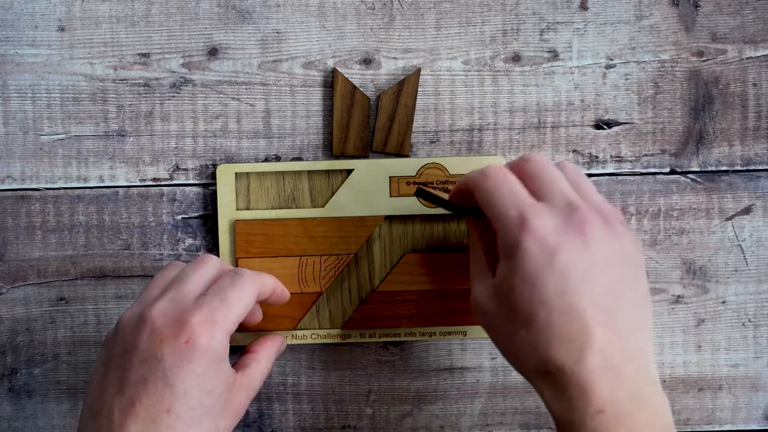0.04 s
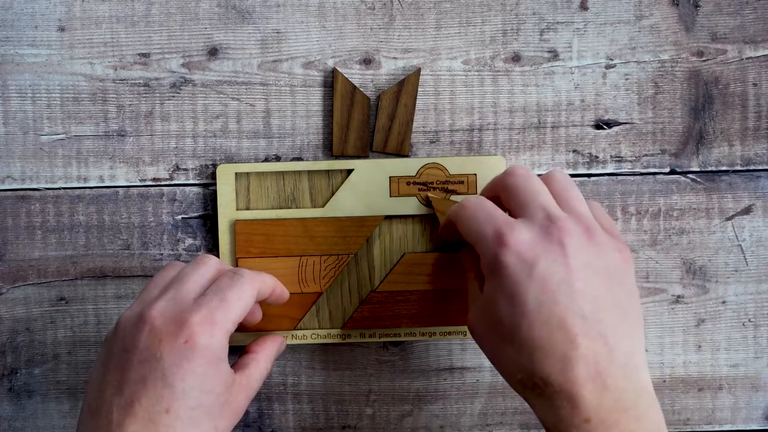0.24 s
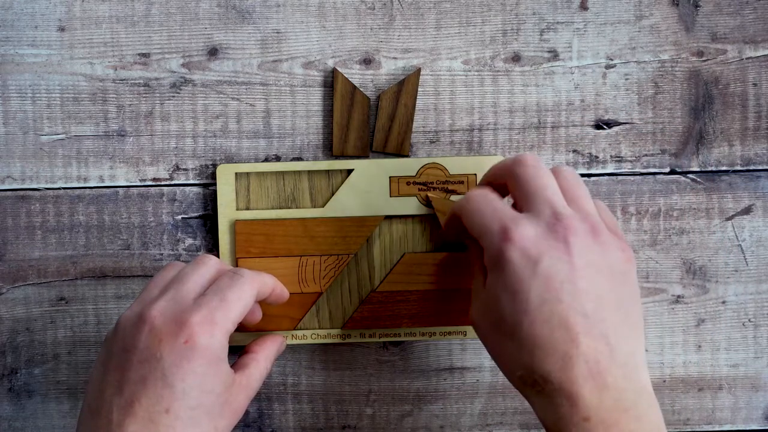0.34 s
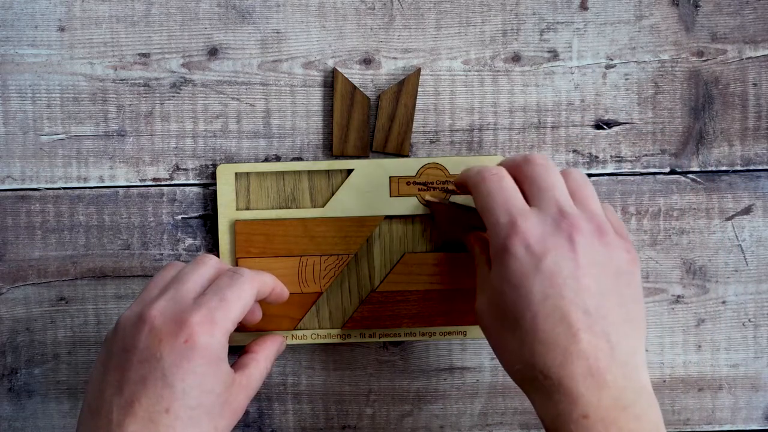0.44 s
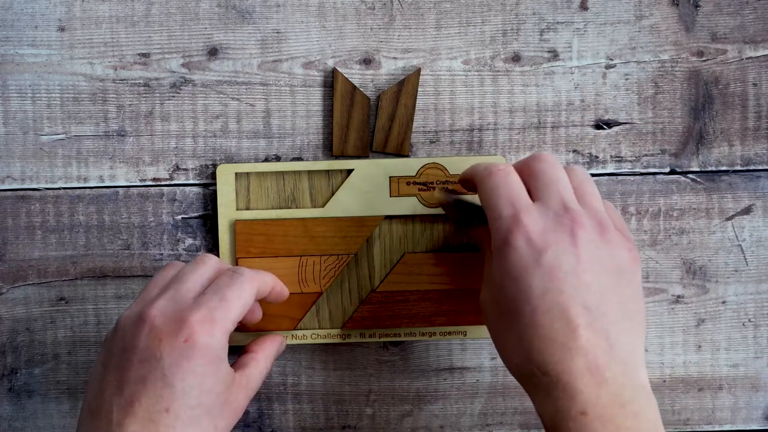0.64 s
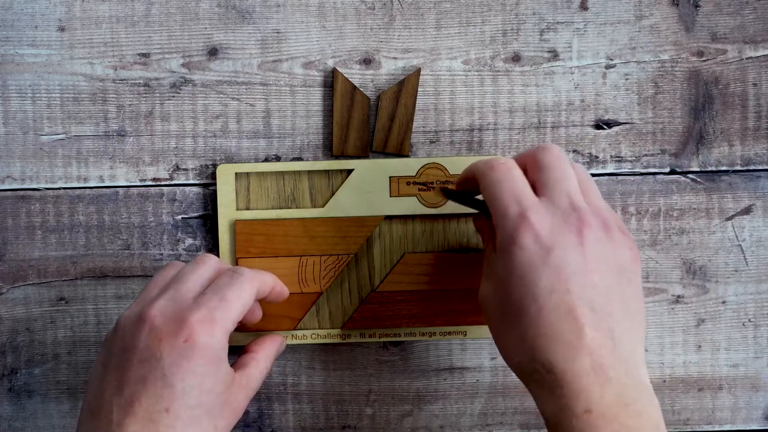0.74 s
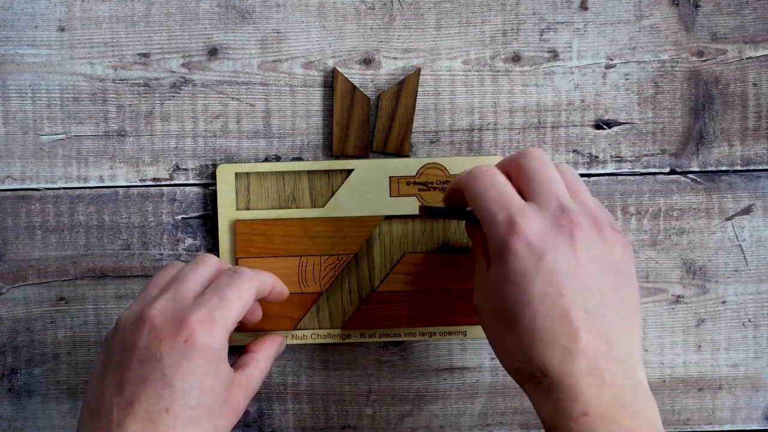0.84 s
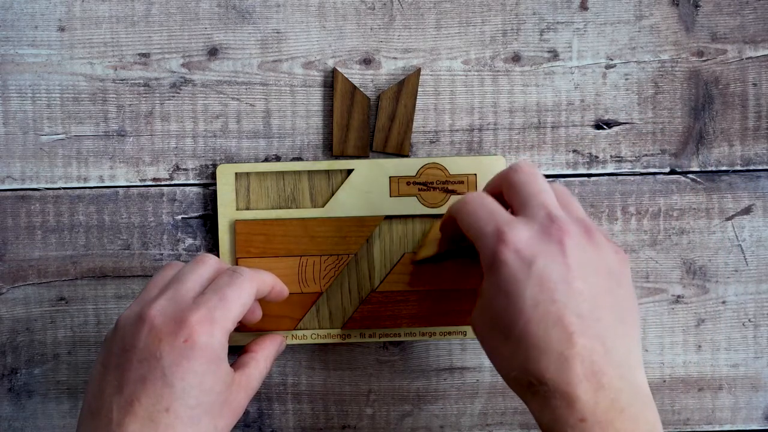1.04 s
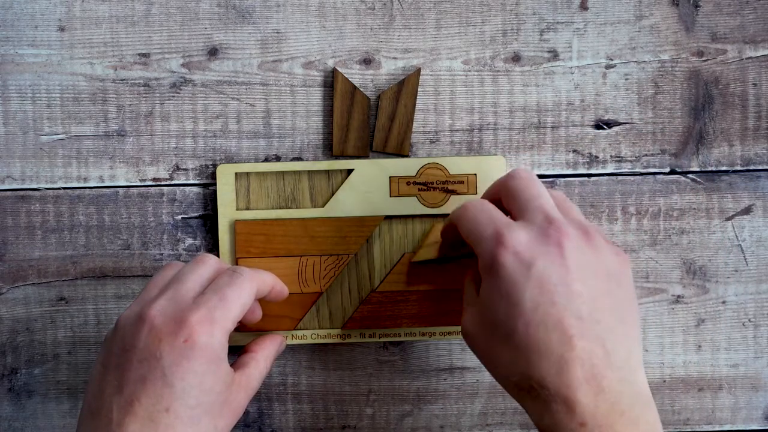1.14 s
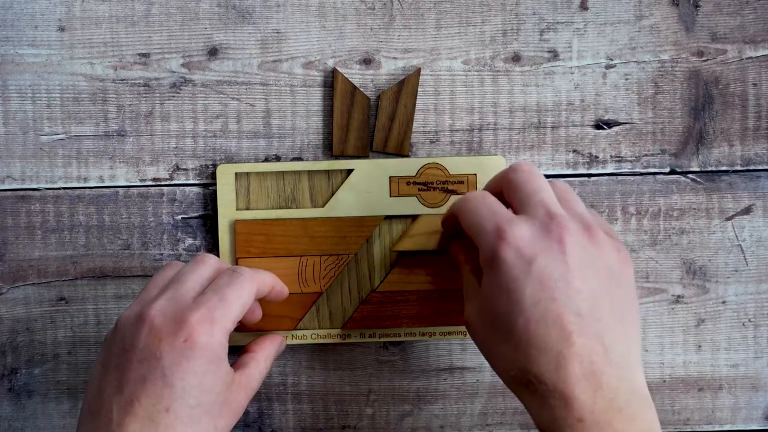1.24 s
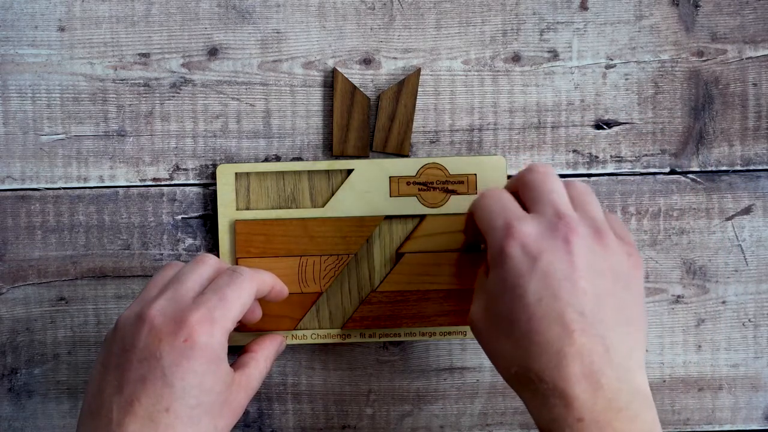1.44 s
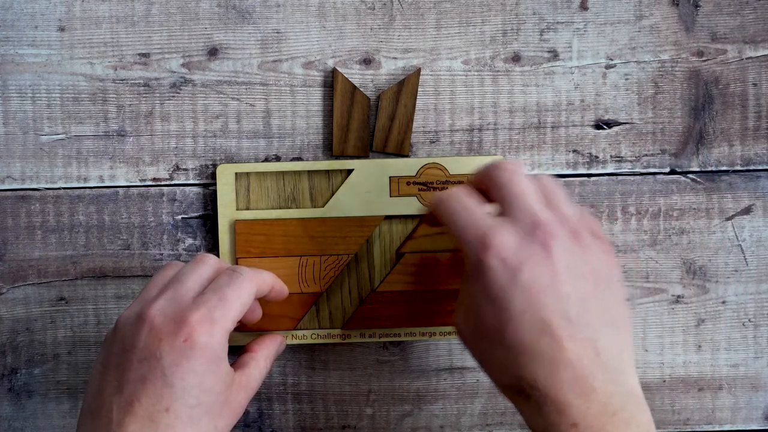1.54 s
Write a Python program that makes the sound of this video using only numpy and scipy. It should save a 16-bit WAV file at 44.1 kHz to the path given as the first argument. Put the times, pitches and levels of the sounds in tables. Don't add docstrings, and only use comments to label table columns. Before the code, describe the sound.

Thin wooden puzzle piece clicking on a plywood frame, close and dry in a small room with faint hiss. Light ticks at 0.04 and 0.16 s, a bright hard rattle with finger brushing at 0.23-0.32, small ticks near 0.5, a soft rub at 0.69, clacks at 1.11, a short scraping drag at 1.23, crisp seating clicks at 1.32, then faint touches until about 1.6.

```python
import sys
import numpy as np
from scipy import signal
from scipy.fft import rfft, irfft, next_fast_len
from scipy.io import wavfile

SR = 44100
rng = np.random.default_rng(int(sys.argv[2]) if len(sys.argv) > 2 else 0)


def gain_from_db(level_db):
    decades = np.asarray(level_db, float) / 20
    return 10 ** decades


def put_to_file(sound):
    columns = np.atleast_2d(sound).T
    safe = np.clip(columns, -1, 1)
    whole_steps = np.round(safe * 32767)
    wavfile.write(sys.argv[1], SR, whole_steps.astype(np.int16))


N = 70560

# pitch_hz, density_db (per Hz)
HUSH = [(18, -67), (30, -40), (233, -8.5), (295, -8), (355, -10.5), (760, -17.5), (2010, -14.5),
        (2170, -19.5), (16000, -36)]
# pitch_hz, likeness (0-1)
HUSH_ALIKE = [(60, 0.073), (300, 0.55), (1400, 0.39), (7000, 0.59), (15000, 1)]
# pitch_hz, t60_s
ROOM_DECAY = [(300, 0.61), (1000, 0.38), (3000, 0.27), (6000, 0.23), (14000, 0.27)]
# pitch_hz, left_minus_right_db
PAN = [(300, .3), (1500, -1.4), (3000, -.2), (6000, -.4), (12000, 1)]

# pitch_hz, level_db, t60_s
TABLE = [(246, -27, 0.014), (323, 20.5, 0.045), (418, 21, 0.012), (910, 22, 0.0098), (1360, -14, .008)]
FRAME = [(880, -3, .011), (1050, -4, .014), (1350, -4, .011), (1620, -2, .012), (2100, -4, .008),
         (2420, -6, .008)]
EDGE = [(7300, -10, 0.0051), (7580, 5.5, 0.0085), (8160, -2.5, 0.0052), (8630, -11, 0.0029),
        (10200, -14, 0.0041), (11200, -6, 0.0034), (14100, 3.5, 0.0059)]
# pitch_hz, level_db, t60_s
SINGING = [(7270, 0, .05), (7410, -2, .035), (14100, -9, .035)]
# pitch_hz, level_db, t60_s
TUMBLING = [(2600, -5.5, 0.0068), (3044, -0.5, 0.0059), (3750, -6.5, 0.0074), (4090, 3.5, 0.0086),
            (4200, 1, 0.0092), (4580, -10, 0.0046), (5130, 0, 0.0096), (5330, -28, 0.002),
            (6560, -11, .005)]
# pitch_hz, level_db, t60_s
LIFTED = [(1467, -7.5, 0.02), (1870, -13, 0.008), (2550, -3.5, 0.0084), (3225, -5.5, 0.009),
          (3760, -2.5, 0.0046), (4040, 1.5, 0.0091), (4345, 4, 0.0094), (4990, -2.5, 0.016),
          (6300, -6, 0.0042)]
# pitch_hz, level_db, t60_s
SEATED = [(1520, -13, .006), (2630, -23, 0.0079), (3300, -16.5, 0.0054), (4150, -5.5, 0.0063),
          (4640, 4, 0.0049), (5230, 5.5, 0.0072), (5750, 9, 0.0037), (6240, 3.5, 0.0079)]
# pitch_hz, level_db, t60_s
HELD = [(2050, 0.5, 0.014), (3180, -1, 0.005), (3830, 6.5, 0.0039), (5180, 6, 0.0052), (6200, -17, 0.0044)]
# pitch_hz, level_db, t60_s
WEDGED = [(2310, 1, 0.0068), (2900, -2, 0.0046), (3500, 2, .005), (4200, -8, .004)]
# pitch_hz, level_db, t60_s
SKIN = [(2580, -6.5, 0.0055), (3710, 5.5, 0.0031), (4650, 7.5, 0.0022), (5630, -3.5, 0.0036),
        (6750, -13, 0.0038)]
# pitch_hz, level_db, t60_s
RUBBED = [(1090, -3.5, 0.013), (1550, -2, 0.012), (2370, -0.5, 0.007), (3500, -6, 0.0035),
          (5300, -3, 0.0052), (7240, -1, 0.0058), (7600, -1, 0.0028), (9100, -9, 0.0028),
          (11800, -4, 0.0018)]
# pitch_hz, level_db, t60_s
SLOT = [(1710, -14, 0.0078), (2260, -2.5, 0.0034), (2960, 3.5, 0.0016), (3240, 2, 0.0027),
        (3800, -16, 0.0055), (7530, -5.5, 0.0053)]

# peak_s, rise_s, fall_s, level_db
BRUSHES = [
    (.28, 0.033, 0.018, -31),
    (.33, 0.037, 0.013, -37.5),
    (1.6, 0.1, 0.039, -44),
]
# peak_s, rise_s, fall_s, level_db
SLIDES = [(.180, 0.006, 0.058, -53), (.205, 0.015, 0.052, -53), (.512, 0.09, 0.026, -56),
          (.585, 0.035, 0.044, -55.5), (1.035, 0.021, 0.051, -55), (1.065, 0.034, 0.16, -55),
          (1.21, 0.012, 0.04, -59)]
# peak_s, rise_s, fall_s, level_db
RUBS = [
    (.66, 0.068, 0.01, -50),
    (.688, 0.034, 0.018, -40),
]
# peak_s, rise_s, fall_s, level_db
DRAGS = [
    (1.226, 0.018, 0.0077, -40),
    (1.238, .012, 0.016, -39.5),
    (1.268, 0.16, 0.077, -48.5),
]
# start_s, level_db
THUDS = [(0.2362, -36), (0.266, -58), (.304, -37), (.9930, -38), (1.043, -42.5), (1.088, -38), (1.109, -34),
         (1.121, -50), (1.32, -83)]
# start_s, level_db, frame_db, edge_db, contact_ms
TOUCHES = [(0.0389, -47.5, -18, 0.5, 0.085), (0.0412, -53.5, -15, 6, 0.06),
           (0.1272, -55.5, 13.5, -29, 0.44), (0.1615, -25.5, -14, -21, 0.17), (0.1623, -35, 5, -28, 0.053),
           (0.428, -40, -17, -22, 0.2), (0.459, -47, 2, -8, 0.14), (0.4955, -28, -17, -9, 0.026),
           (0.502, -56.5, 3.5, -18, 0.047), (0.5054, -54, 17, -35, 0.18), (1.0384, -51, -15, 8, 0.055),
           (1.0439, -38, 7.5, -9, 0.31), (1.0494, -41, 10, 5.5, 0.15), (1.057, -59, 2, -8, .4),
           (1.0900, -45, 11.5, 4.5, 0.25), (1.0957, -44, -4, 4, 0.19), (1.207, -48, -15, -1, 0.46),
           (1.2222, -25.5, -20, -12, 0.27), (1.2325, -34, -28, -18, 0.3), (1.2358, -30, -14, -14, 0.27),
           (1.238, -30, -7.5, -18, 0.5), (1.454, -40, -7, -14, 0.16), (1.5192, -41.5, -6, -7, .12),
           (1.3082, -32, -27, -26, 0.16), (.9925, -62.5, 10.5, -7, 0.2)]
# start_s, level_db
CLICKS = [(.2350, -9), (.2363, -15), (.2491, -25), (.2664, -10), (.2682, -10), (.2688, -14), (.2715, -9),
          (.2758, -24), (.2822, -25), (.3031, -10), (.3056, -11), (.3190, -24), (.3201, -18), (1.1087, -9),
          (1.1152, -11), (1.1214, -14), (1.1261, -23), (1.1352, -26), (1.3178, -7), (1.3184, -15),
          (1.3214, -6), (1.3228, -16), (1.3265, -20), (1.3352, -26), (1.3445, -29)]
# frame_db, edge_db, contact_ms
CLICK_COLOURS = [(-15, -9, .07), (-20, 0, .1), (-14, -6, .1), (-24, -16, .16), (-22, -8, .12),
                 (-24, -10, .12), (-24, -9, .16), (-18, -12, .2), (-16, -6, .15), (-22, -14, .17),
                 (-20, -8, .14), (-24, -16, .2), (-22, -12, .2), (-22, -3, .11), (-18, 2, .08),
                 (-16, -16, .18), (-16, -10, .18), (-16, -5, .15), (-32, -5, .1), (-32, 0, .09),
                 (-34, -1, .06), (-28, -8, .11), (-24, -10, .14), (-22, 2, .1), (-22, -2, .1)]

FRAME_LOW_HZ, PIECE_LOW_HZ = 465, 1296
RING_S = np.arange(SR // 16) / SR


def unit(x):
    return x / np.sqrt(np.mean(x ** 2) + 1e-20)


def along(points, hz):
    point_hz, value = np.transpose(points)
    return np.interp(np.log(hz + 1), np.log(point_hz + 1), value)


def filtered(x, response):
    m = next_fast_len(N + 8192)
    return irfft(rfft(x, m) * response(np.fft.rfftfreq(m, 1 / SR)), m)[..., :N]


def above(x, low_hz):
    return filtered(x, lambda hz: (-hz * hz / (low_hz ** 2 - hz * hz + 1.3j * hz * low_hz)) ** 2)


def soften(x, contact_ms):
    u = np.arange(.5, 40) / SR / (max(contact_ms, .04) / 1000)
    push = np.sin(np.pi * np.minimum(u, 1)) ** 2 + 1e-9
    return np.convolve(x, push / push.sum())[:len(x)]


def ring(modes, draws):
    detune, scatter_db, attack_s = .015, 1.5, .00006
    hz, db, t60 = np.transpose(modes)[:, :, None]
    off = draws[:len(modes)]
    level = gain_from_db(db + scatter_db * off[:, :1] - 60 * RING_S / t60)
    swing = -np.sin(2 * np.pi * hz * (1 + detune * off[:, 1:]) * RING_S)
    onset = 1 - np.exp(-RING_S / attack_s)
    return (level * swing).sum(0) * onset / gain_from_db(db).sum() * 2


def add(out, s, x):
    part = out[round(s * SR):][:len(x)]
    part += x[:len(part)]


def spread(a, b, likeness):
    turn = np.arccos(np.clip(likeness, 0, 1)) / 2
    return np.cos(turn) * a, np.sin(turn) * b


def hush():
    def response(hz):
        return gain_from_db(along(HUSH, hz)) * np.array(spread(1, 1, along(HUSH_ALIKE, hz)))
    mid, side = filtered(rng.standard_normal((2, N)), response)
    return gain_from_db(-63) * np.array([mid + side, mid - side]) / mid.std()


def room(x):
    level_db, likeness, gap_s = -8, 0.78, .003
    out, step = np.zeros((2, N + SR)), SR // 50
    for i in range(0, N, step):
        hz, t, z = signal.stft(rng.standard_normal((2, SR // 2)), SR, nperseg=128)
        decay = gain_from_db(-60 * t / along(ROOM_DECAY, hz)[:, None])
        a, b = signal.istft(z * decay, SR, nperseg=128)[1]
        mid, side = spread(a, b, likeness)
        tail = np.array([mid + side, mid - side]) / np.linalg.norm(a)
        wet = signal.fftconvolve(x[None, i:i + step], tail, axes=1)
        start = i + round(gap_s * SR)
        out[:, start:start + wet.shape[1]] += wet
    return gain_from_db(level_db) * out[:, :N]


def friction(strokes, bodies, contact_ms):
    grains_per_s, grain_spread_db = 6000, 2
    t = np.arange(N) / SR
    power = np.zeros(N)
    for s, rise, fall, db in strokes:
        drop_db = 20 * np.where(t < s, (s - t) / rise, (t - s) / fall)
        power += gain_from_db(db - drop_db) ** 2
    chance, sign, size = rng.random((3, N))
    grain = np.sign(sign - .5) * gain_from_db(-grain_spread_db * np.log(size + 1e-2))
    slips = (chance < grains_per_s / SR) * grain
    body = sum(gain_from_db(db) * unit(ring(modes, np.zeros((9, 2)))) for modes, db in bodies)
    body = soften(body, contact_ms)
    return signal.fftconvolve(unit(slips) * np.sqrt(power), body / np.linalg.norm(body))[:N]


def rubbing():
    brushes = friction(BRUSHES, [(SKIN, 0)], .074)
    slides = friction(SLIDES, [(FRAME, 0), (SKIN, -4.5), (EDGE, -17.5), (SINGING, -10.5)], .032)
    rubs = friction(RUBS, [(RUBBED, 0)], .066)
    drags = friction(DRAGS, [(SLOT, 0)], .087)
    return above(brushes + slides + rubs + drags, FRAME_LOW_HZ)


def thuds():
    table = np.zeros(N)
    for s, db in THUDS:
        add(table, s, -gain_from_db(db) * soften(ring(TABLE, rng.standard_normal((5, 2))), .6))
    return table


def crack(edge_db, contact_ms):
    level_db, t60_s, edge_share, top_hz = -9, 0.013, 0.095, 10000
    start_db = level_db - (1 - edge_share) * edge_db - 40 * max(contact_ms - .15, 0)
    noise = gain_from_db(start_db - 60 * RING_S / t60_s) * rng.standard_normal(len(RING_S))
    return signal.lfilter(*signal.butter(2, top_hz, fs=SR), noise)


def strike(modes, singing_db, edge_db, contact_ms):
    edge_ms = .11
    draws = rng.standard_normal((4, 9, 2))
    body = soften(soften(ring(modes, draws[0]), contact_ms), edge_ms)
    singing = gain_from_db(singing_db) * ring(SINGING, draws[3] * [1, .15])
    edge = ring(EDGE, draws[2]) + crack(edge_db, contact_ms) + singing
    piece = body / abs(body).max() + gain_from_db(edge_db) * soften(edge, edge_ms)
    return piece, soften(ring(FRAME, draws[1]), contact_ms)


def click_hold(s):
    if s >= 1.2:
        return SEATED, -22.5
    if s >= 1.1:
        return LIFTED, -12.5
    return TUMBLING, -15.5


def contacts():
    piece, frame = np.zeros((2, N))
    blows = [(*click, *colour, *click_hold(click[0])) for click, colour in zip(CLICKS, CLICK_COLOURS)]
    for touch in TOUCHES:
        at_slot = 1.2 < touch[0] < 1.5
        blows.append((*touch, WEDGED if at_slot else HELD, -18))
    for s, db, frame_db, edge_db, contact_ms, modes, singing_db in blows:
        piece_ring, frame_ring = strike(modes, singing_db, edge_db, contact_ms)
        add(piece, s, gain_from_db(db) * piece_ring)
        add(frame, s, gain_from_db(db + frame_db) * frame_ring)
    return above(piece, PIECE_LOW_HZ) + above(frame, FRAME_LOW_HZ)


def scene():
    wood = above(thuds() + contacts(), 220) + rubbing()
    sides = np.array([[1], [-1]])
    near = filtered(wood, lambda hz: gain_from_db(along(PAN, hz) / 2 * sides))
    return hush() + room(wood) + near


def band_limit(x):
    return signal.sosfilt(signal.butter(12, 16470, fs=SR, output="sos"), x)


def record(dry):
    mix = filtered(dry, lambda hz: 1 / np.sqrt(1 + (hz / 15700) ** 24))
    return band_limit(mix)


dry = scene()
out = record(dry)
put_to_file(out)
```